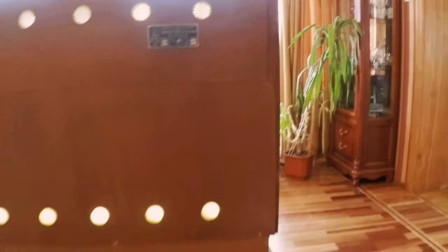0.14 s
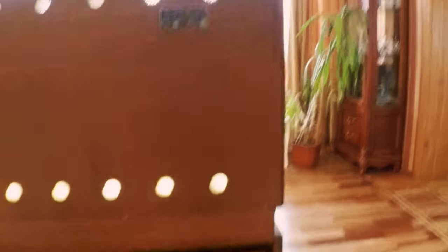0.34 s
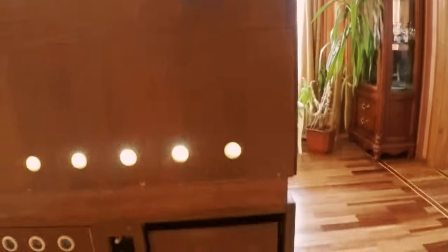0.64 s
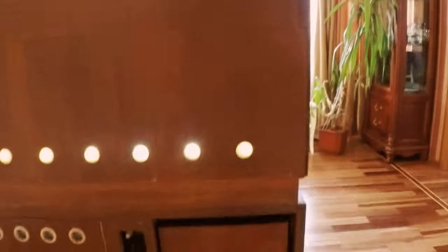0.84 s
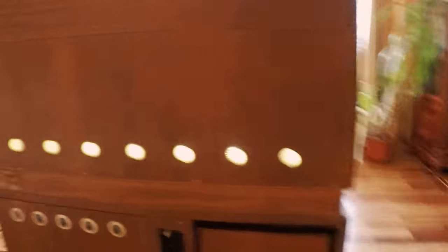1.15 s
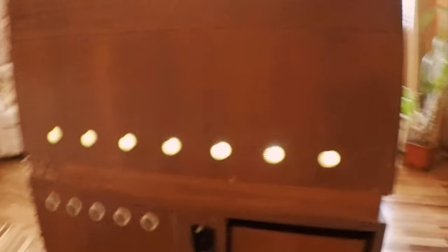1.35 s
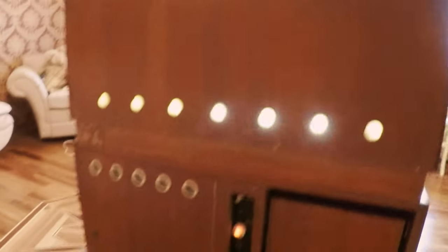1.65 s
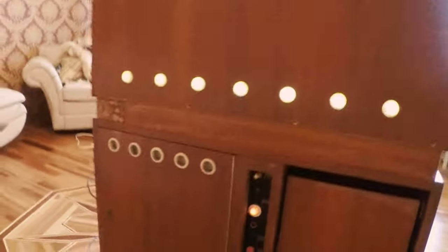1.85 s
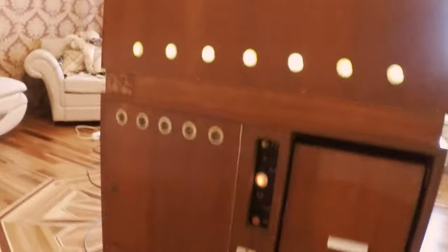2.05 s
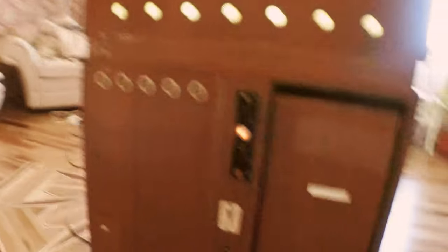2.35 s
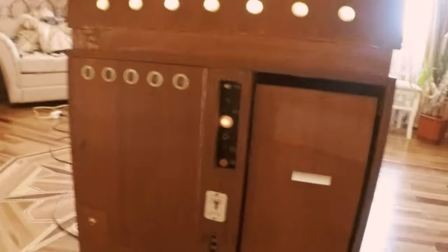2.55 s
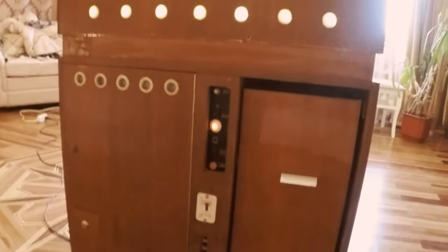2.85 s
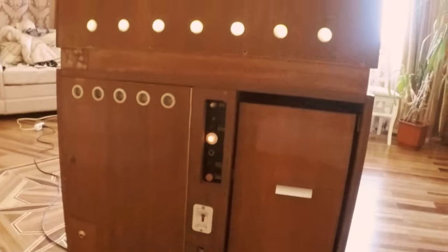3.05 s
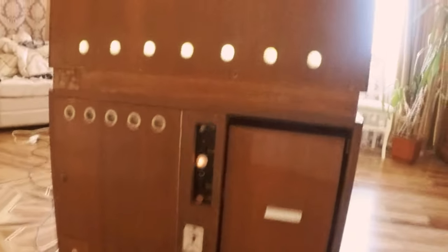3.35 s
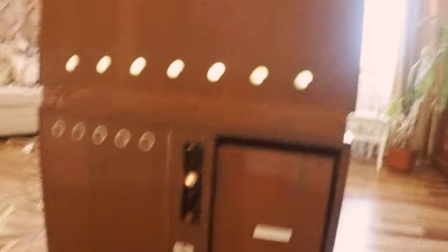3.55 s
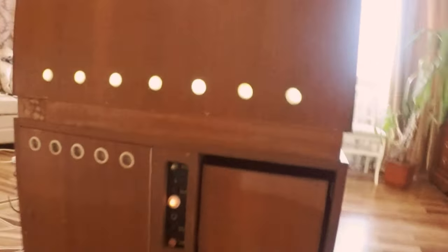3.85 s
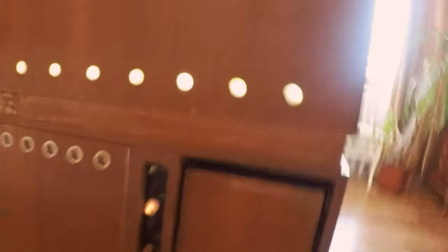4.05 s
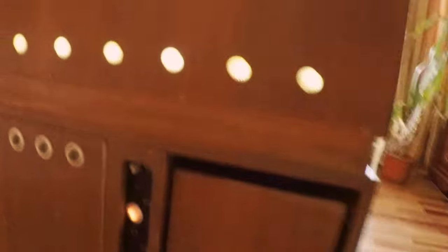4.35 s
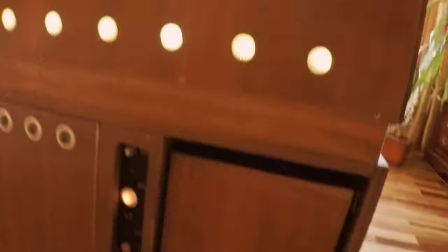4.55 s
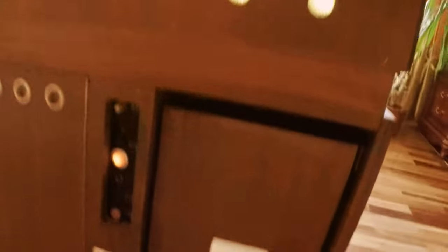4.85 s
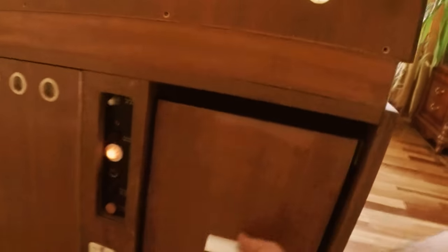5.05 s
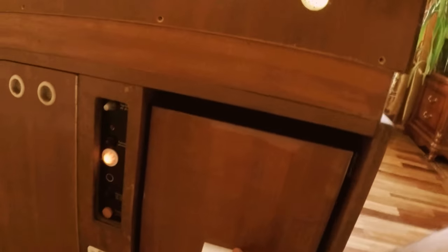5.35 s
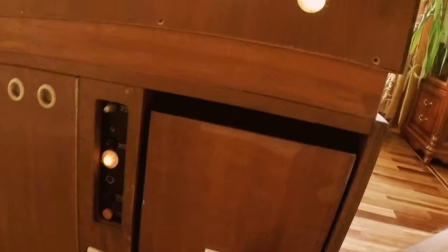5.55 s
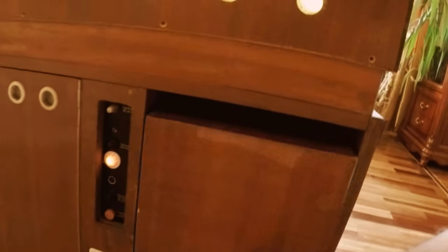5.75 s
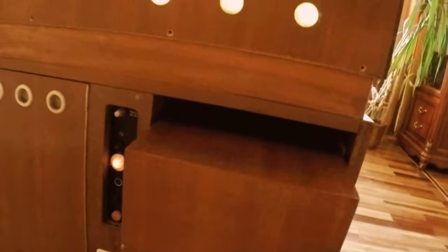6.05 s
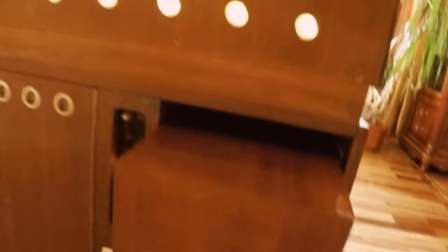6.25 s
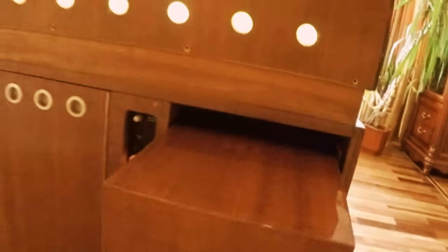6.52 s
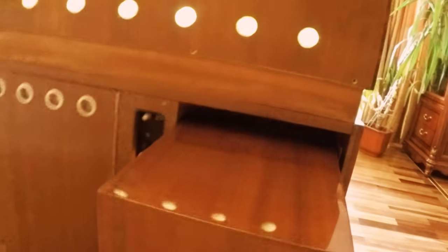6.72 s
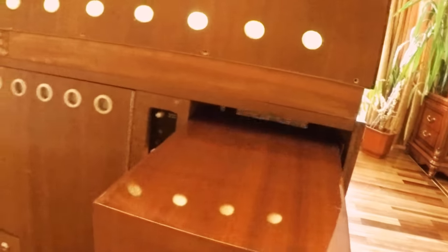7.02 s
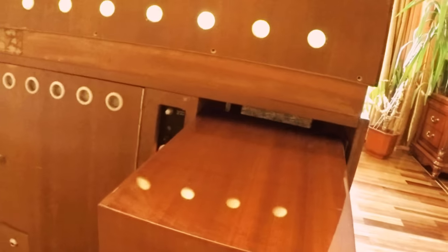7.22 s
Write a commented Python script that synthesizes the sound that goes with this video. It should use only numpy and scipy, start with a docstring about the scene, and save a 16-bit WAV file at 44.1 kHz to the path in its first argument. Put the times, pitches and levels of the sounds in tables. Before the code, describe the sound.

For the first two seconds there is only quiet room rumble, faint hiss and soft hand and sleeve rustle, strongest near 1.5. Light mechanism taps come at 2.2 and 2.4, then a dry bright snap at 2.5 with a short room tail. From 2.7 to 3.3 a small coin clinks in very high, thin rings and grazes a chute; from 3.1 its metallic scrapes repeat ever faster and fainter until about 4.2. Parts rub and knock from 3.6, and at 4.1 one hard, loud clack stands out, followed by clicks and a lesser clunk at 4.4. Quiet taps follow. From 5.1 a heavy wooden drawer drags, with gritty groans around 5.4. At 6.0 it breaks free with a deep thump and low cabinet shudder, then scrapes, clicks and groans near 6.4, fading into light sliding, with small knocks at 6.7 and 7.3.

```python
"""A coin clinks and rattles, wobbling ever faster, through the mechanism of a wooden jukebox in a quiet room.
Struck coin modes beat in close pairs; grazing noise drives the same metal into song.
The mechanism rubs and knocks close by as decaying modes and noise bursts, with one hard clack; catches click.
The room answers a sharp snap. Then the heavy drawer scrapes in swelling friction noise, breaks free with
a thump that shakes the cabinet, and rolls out. Hand and sleeve movements and room noise lie underneath."""
import sys
import numpy as np
from scipy import signal
from scipy.fft import rfft, irfft, next_fast_len
from scipy.io import wavfile
from scipy.ndimage import uniform_filter1d, map_coordinates

SR = 44100
rng = np.random.default_rng(int(sys.argv[2]) if len(sys.argv) > 2 else 0)


def wrap_up_sound(samples):
    """Save the sound to the file named by the first command line argument, as 16-bit audio."""
    columns = np.atleast_2d(samples).T
    # keep every value between -1 and 1, then stretch to whole-number steps
    tamed = np.clip(columns, -1, 1)
    steps = np.round(tamed * 32767).astype(np.int16)
    wavfile.write(sys.argv[1], SR, steps)


N = 325502
T = np.arange(N) / SR

# In all tables, levels are relative: function trims or normalisation follow.
# Strikes on the coin. Each row: start in seconds, tick level in dB, ring level in dB,
# pitch favoured by the struck spot in Hz.
COIN_STRIKES = [(2.4134, -57, -49.5, 13700), (2.7004, -45, -39, 12300), (2.7666, -25.5, -30, 11700),
                (2.8025, -30, -29.5, 12600), (2.8627, -36, -45, 11860), (2.88, -34.5, -43, 11860),
                (2.9114, -43.5, -44, 11120), (2.958, -42, -47, 11120), (3.0051, -33, -39, 7835),
                (3.039, -41, -35, 7835), (3.057, -39.5, -62, 7835), (3.1024, -44, -35, 13500),
                (3.2303, -44.5, -41, 11120), (3.2914, -35, -40, 13300), (3.4564, -50, -39.5, 13500),
                (4.1374, -40.5, -41.5, 13500)]
# Modes of the coin, each a close pair. Each row: frequency in Hz, split in Hz, t60 in seconds.
COIN_MODES = [(7835, 55, .17), (11120, 28, .12), (11860, 14, .17), (13495, 75, .15)]
# Spectrum of the contact tick. Each row: frequency in Hz, level in dB per Hz.
TICK_SPECTRUM = [(1000, -25.5), (2000, -27.5), (2600, -2.5), (3400, -21), (4600, 3.5), (5500, -4),
                 (6300, 1), (8500, -13.5), (15000, -1.5)]
# the highest mode rings best; modes away from the spot stay weak
TOP_MODE_DB, OTHER_MODES_DB, SPOT_WIDTH_HZ = 6, -13, 550


def clinks(ring_db=-5, tick_db=-1, twin=0.4):
    """Modal beating: each strike ticks and rings split mode pairs, mixed by the spot that is hit."""
    out, t = np.zeros(N), T[:SR // 3]
    onset = 1 - np.exp(-t / 0.00078)
    for start, strike_tick_db, strike_ring_db, spot_hz in COIN_STRIKES:
        tick = crest(coloured(rng.standard_normal(len(t)) * fade(t, 0.017), TICK_SPECTRUM))
        add(out, start, amp(strike_tick_db + tick_db) * tick)
        for hz, split_hz, t60 in COIN_MODES:
            away = 1 - np.exp(-.5 * ((hz - spot_hz) / SPOT_WIDTH_HZ) ** 2)
            is_top = hz == COIN_MODES[-1][0]
            mode_db = strike_ring_db + OTHER_MODES_DB * away + TOP_MODE_DB * is_top
            main = np.sin(2 * np.pi * hz * t)
            partner = np.sin(2 * np.pi * (hz + split_hz) * t + rng.standard_normal())
            ring = (main + twin * partner) * fade(t, t60) * onset
            add(out, start, amp(mode_db + ring_db) * crest(ring))
    return out


# The tumbling coin grazing the chute. Each row: centre in seconds, scrape level in dB, ring level in dB.
CHUTE_GRAZES = [(2.839, -41, -56), (2.8963, -39, -61), (2.9616, -51, -51.5), (3.022, -48.5, -45),
                (3.0829, -40, -45), (3.121, -42, -37)]
# The coin sliding between turns. Each row: time in seconds, hiss level in dB.
SLIDE_LEVELS = [(2.72, -90), (2.776, -54), (2.946, -64.5), (3.22, -53.5), (3.642, -62), (4.106, -65.5),
                (4.196, -62.5), (4.338, -68), (4.42, -75)]
# Spectra of the slide, the rim's scrape and the last scrape. Each row: frequency in Hz, level in dB per Hz.
SLIDE_SPECTRUM = [(1000, -21.5), (2300, 3.5), (3200, -7), (4300, 6), (6500, 1), (7300, -4.5), (7900, 4),
                  (9400, 4.5), (10500, 0.5), (12500, 2), (14200, -4.5), (15300, -2.5)]
SCRAPE_SPECTRUM = [(2000, -22), (4300, -5.5), (7300, -11.5), (8000, -2.5), (9300, 7), (10300, -6),
                   (12300, -7), (13200, -5.5), (14200, -20), (15300, 5)]
EXIT_SPECTRUM = [(2500, -15), (4200, -3.5), (4700, 4.5), (6400, -2.5), (7300, -12), (9000, -10.5),
                 (14000, -16.5)]
# Coin resonances that scraping excites. Each row: frequency in Hz, width in Hz, level in dB.
COIN_RESONANCES = [(7880, 90, -8.5), (11200, 90, -19), (13480, 110, 2)]
# the last scrape swells and stops dead
EXIT_START_S, EXIT_END_S, EXIT_RISE_S, EXIT_DB = 4.22, 4.342, .04, -47.5


def rattle(scrape_db=2.5, ring_db=-2.5, slide_db=4, slide_ring_db=-4, contact_s=0.0066, ring_t60=0.077,
           chatter_db=0.5):
    """Friction excitation: each graze or turn is a burst of grainy noise, and the coin sings on after it."""
    scrape, ring = np.zeros(N), np.zeros(N)
    t = T[:SR // 3] - .04  # the contact is centred on zero
    for centre, graze_db, sing_db in CHUTE_GRAZES + turns():
        contact = np.exp(-.5 * (t / contact_s) ** 2)
        ringing = np.where(t < 0, contact, fade(abs(t), ring_t60))
        add(scrape, centre + t[0], amp(graze_db + scrape_db) * contact)
        add(ring, centre + t[0], amp(sing_db + ring_db) * ringing)
    chatter = unit(amp(chatter_db * wobble(120)))
    slide = amp(slide_db) * levels(SLIDE_LEVELS)[0] * chatter
    rim = scrape * noise(SCRAPE_SPECTRUM, grain_db=4.0) + slide * noise(SLIDE_SPECTRUM, grain_db=2.0)
    exit_swell = stroke(EXIT_START_S, EXIT_END_S, EXIT_RISE_S, release=.007)
    leaving = amp(EXIT_DB) * exit_swell * noise(EXIT_SPECTRUM, grain_db=2.5)
    song = (ring + amp(slide_ring_db) * slide) * singing(COIN_RESONANCES)
    return rim + leaving + song


# the coin rolls downhill, gaining speed evenly, and its rim scrapes once a turn
ROLL_START_S, TURNS_PER_S, TURNS_PER_S2, TURN_COUNT = 3.1107, 9.836, 9.727, 19
TURN_SCRAPE_DB, TURN_RING_DB, TURN_FADE_DB_PER_S = -39.5, -40.5, 12


def turns(scatter_db=1.8):
    """Uniform acceleration: turns come ever faster and on average fainter, as (s, scrape dB, ring dB)."""
    speed = np.sqrt(TURNS_PER_S ** 2 + 2 * TURNS_PER_S2 * np.arange(TURN_COUNT))
    age = (speed - TURNS_PER_S) / TURNS_PER_S2
    db = scatter_db * rng.standard_normal(TURN_COUNT) - TURN_FADE_DB_PER_S * age
    return list(zip(ROLL_START_S + age, TURN_SCRAPE_DB + db, TURN_RING_DB + db))


# Knocks of the mechanism. Each row: start in seconds, level in dB, hardness in dB, strongest pitch in Hz.
MECHANISM_KNOCKS = [(2.206, -45, -20, 636), (2.384, -47.5, -20, 714), (3.684, -37, -19, 1010),
                    (3.839, -30, -22, 660), (3.889, -43, -21, 620), (3.95, -39, -2, 644),
                    (3.981, -21.5, -24, 680), (4.087, -3.5, -2.5, 690), (4.1005, -22, -3, 618),
                    (4.18, -29.5, 1, 807), (4.2265, -32, 0.5, 1100), (4.241, -23, -29, 450),
                    (4.294, -34, -5.5, 900), (4.4247, -17, -11, 1027), (4.715, -44.5, -23, 838),
                    (4.855, -50, -21, 805), (6.674, -46, -20, 416.3), (7.299, -40.5, -19, 725)]
# Modes of the housing. Each row: frequency in Hz, level in dB, t60 in seconds for a 0 dB blow.
HOUSING_MODES = [(68.5, -9, 0.1), (107, -14, .08), (144, -15, 0.033), (200, -10, 0.11), (281, -11, 0.16),
                 (456.7, -5.5, 0.12), (556.4, -9, 0.084), (699, 1, 0.065), (782, -3.5, 0.086),
                 (1033, -2, 0.047), (1100, 0, .04), (1190, -9, 0.065), (1284, -12, 0.07),
                 (1610, -13.5, 0.042), (1707, -7.5, 0.048), (1800, -25, 0.29), (2010, -12.5, 0.062),
                 (2350, -12, 0.1), (2290, -17, 0.04), (2530, -15, .04), (2424, -11.5, 0.091),
                 (2940, -19.5, .03), (4140, -20.5, 0.061), (4200, -28, .028), (4770, -24, .028),
                 (4960, -29, 0.026)]
# Spectra of the contact crack and of the many short-lived modes heard as one burst.
# Each row: frequency in Hz, level in dB per Hz.
CRACK_SPECTRUM = [(100, 6), (500, -16.5), (1100, -10.5), (2500, 1), (3600, -18), (4500, -7), (5700, -31),
                  (6400, -20.5), (7500, -36), (15000, -45.5)]
CLUNK_SPECTRUM = [(180, -41.5), (300, -12), (755, 0.5), (1170, -10), (1460, -19), (1750, -8), (1980, -16.5),
                  (2540, -15), (3670, -34), (4470, -26.5), (7000, -45), (9100, -74), (15400, -120)]
RING_DOUBLES_DB = 56.5  # a blow this much stronger rings twice as long


def knocks(bass_db=-11.0, mid_db=-2.5, treble_db=-4, crack_db=-6.0, clunk_db=-2, clunk_t60=.04,
           rise_cycles=.7, focus_db=7, focus_octaves=.25, contact_db=7, contact_t60=0.0072):
    """Impact hardness: soft blows ring the middle modes, hard ones clunk and wake all; the spot favours a few."""
    out, t = np.zeros(N), T[:SR // 3]
    hz, mode_db, t60 = np.transpose(HOUSING_MODES)[:, :, None]
    register = np.digitize(hz[:, 0], [400, 1500])  # bass, middle, treble
    # high modes answer first; all are driven harder while the contact lasts
    onset = 1 - np.exp(-t * np.maximum(hz, 400) / rise_cycles)
    drive = onset * (1 + amp(contact_db) * fade(t, contact_t60))
    for start, db, hard_db, spot_hz in MECHANISM_KNOCKS:
        spot = np.exp(-.5 * (np.log2(hz / spot_hz) / focus_octaves) ** 2)
        swing = np.sin(2 * np.pi * (hz * t + rng.random(hz.shape)))
        decay = fade(t, t60 * 2 ** (db / RING_DOUBLES_DB))
        modes = amp(mode_db + focus_db * spot) * swing * drive * decay
        for k, level in enumerate([hard_db + bass_db, mid_db, hard_db + treble_db]):
            add(out, start, amp(db + level) * crest(modes[register == k].sum(0)))
        for spectrum, level, burst_t60 in [(CRACK_SPECTRUM, crack_db, .012), (CLUNK_SPECTRUM, clunk_db, clunk_t60)]:
            burst = rng.standard_normal(len(t)) * fade(t, burst_t60) * (1 - np.exp(-t / .0004))
            add(out, start, amp(db + hard_db + level) * crest(coloured(burst, spectrum)))
    return out


# Clicks of a small stiff catch. Each row: start in seconds, level in dB.
CATCH_CLICKS = [(4.0854, -22), (4.1001, -32), (4.181, -34.5), (4.378, -46), (4.4251, -32), (4.7708, -38.5),
                (5.18, -54), (6.366, -29.5)]
# Modes of the catch. Each row: frequency in Hz, level in dB, t60 in seconds.
CATCH_MODES = [(890, 5, 0.014), (1784, -4.5, 0.01), (2550, -1, 0.017), (3200, -4.5, 0.011),
               (4437, 0.5, .02), (5076, -11.5, 0.018), (6380, -9.5, 0.017), (7140, -16.5, .01),
               (9410, -16, .008), (13790, -21.5, 0.009)]


def catches():
    """Heavily damped modes: each tiny click rings for a few milliseconds, its mode mix varying."""
    out, t = np.zeros(N), T[:SR // 20]
    for start, db in CATCH_CLICKS:
        ring = np.zeros(len(t))
        for hz, level, t60 in CATCH_MODES:
            gain = amp(level + rng.normal(0, 1.9))
            ring += gain * np.sin(2 * np.pi * (hz * t + rng.random())) * fade(t, t60)
        add(out, start, amp(db) * crest(ring * (1 - np.exp(-t / 0.00017))))
    return out


# Parts rubbing in the mechanism and along the drawer. Each row: start in seconds, end in seconds,
# low band level in dB, high band level in dB.
RUB_STROKES = [(3.553, 3.629, -46, -59), (3.631, 3.775, -56.5, -64.5), (3.947, 4.04, -46.5, -47.5),
               (4.04, 4.19, -41.5, -51.5), (4.216, 4.251, -37, -62), (4.252, 4.331, -48.5, -55),
               (6.06, 6.15, -45, -52)]
# Spectra of the low and high rubbing bands. Each row: frequency in Hz, level in dB per Hz.
RUB_LOW_SPECTRUM = [(150, -14.5), (400, 0), (550, 2.5), (800, 9), (1100, 5), (1500, -4.5), (2200, -29.5),
                    (4000, -36.5)]
RUB_HIGH_SPECTRUM = [(900, -26), (1700, -5.5), (2330, -1), (2500, 11), (2680, -3.5), (3400, -13.5),
                     (4020, -5.5), (4270, 1.5), (4500, -2.5), (5300, -8.5), (5900, -8.5), (6500, -12.5),
                     (7400, -22), (14000, -30.5)]


def rubs(release=0.004):
    """Sliding friction: parts passing over each other give short strokes of grainy noise."""
    low, high = np.zeros(N), np.zeros(N)
    for start, end, low_db, high_db in RUB_STROKES:
        contact = stroke(start, end, rise=0.0022, release=release)
        low += amp(low_db) * contact
        high += amp(high_db) * contact
    return low * noise(RUB_LOW_SPECTRUM, grain_db=1.5) + high * noise(RUB_HIGH_SPECTRUM, grain_db=2.0)


# Spectrum of the snap. Each row: frequency in Hz, level in dB per Hz.
SNAP_SPECTRUM = [(200, -34), (450, -4), (1000, -12), (1400, -3.5), (1720, -10.5), (2000, 6.5), (2250, -4.5),
                 (2650, 3), (3200, -8.5), (3900, -1.5), (5200, -8.5), (6500, -14), (10000, -21),
                 (15000, -21)]
SNAP_S = 2.4722


def snap(db=-28, room_db=-1, crack_t60=0.025):
    """Direct and reverberant sound: one dry, bright crack wakes the room."""
    direct, sent, t = np.zeros(N), np.zeros(N), T[:SR // 8]
    burst = rng.standard_normal(len(t)) * fade(t, crack_t60) * (1 - np.exp(-t / .002))
    add(direct, SNAP_S, amp(db) * crest(coloured(burst, SNAP_SPECTRUM)))
    # summed over all directions, the room receives the crack's smooth overall colour
    impulse = 1.0 * (t == 0)
    add(sent, SNAP_S, amp(db + room_db) * crest(coloured(impulse, SNAP_SPECTRUM)))
    return direct + room(sent)


# Pulls on the drawer, and one small knock just before the thump. Each row: peak time in seconds,
# rise in seconds, fall in seconds, wood level in dB, grit level in dB, groan level in dB,
# groan pitch in Hz (blended between rows).
DRAWER_EFFORTS = [(5.14, 0.00799, .08, -52.5, -93.5, -54.5, 329.3), (5.36, .06, .03, -51, -59, -51.5, 430),
                  (5.422, .02, .02, -49, -41.5, -38, 550), (5.459, .018, .04, -50, -45.5, -40, 610.3),
                  (5.89, 0.0051, 0.02496, -44, -77, -51, 400), (6.07, 0.014, .09, -37.5, -49, -54, 480),
                  (6.18, .012, .033, -33, -51.5, -54, 476.3), (6.405, .022, 0.061, -33, -51, -35.5, 424.4),
                  (6.63, 0.031, 0.0409, -43.5, -59.5, -46.5, 410), (7.02, 0.049, .15, -56, -81.5, -63, 422)]
# Spectra of the wood on its runners and of the grit. Each row: frequency in Hz, level in dB per Hz.
WOOD_SPECTRUM = [(71, -42), (120, -5), (167, -13.5), (232, -4.5), (258, -1.5), (330, -1.5), (386, -0.5),
                 (511, -5), (556, 0), (727, -7.5), (962, -13.5), (1130, -26.5), (2200, -28), (2860, -50),
                 (4840, -120)]
GRIT_SPECTRUM = [(900, 4.5), (1500, -3), (2200, -2), (2600, 5.5), (2900, -5.5), (3400, -13.5), (4800, -7.5),
                 (6200, -21), (8000, -43.5), (14000, -39.5)]
# Resonances of the runner's rail. Each row: frequency in Hz, width in Hz, level in dB.
RAIL_RESONANCES = [(2320, 130, -6), (2820, 77, 9)]
# between pulls the drawer keeps dragging, ever more lightly
DRAG_START_S, DRAG_RISE_S, DRAG_FADE_DB_PER_S = 5.22, 0.024, 4.5
DRAG_WOOD_DB, DRAG_GRIT_DB = -52.5, -58.5


def drawer(wood_db=-2, grit_db=-1, rasp_db=-6, groan_wander_hz=95, groan_rough_db=3.0, judder_db=0.5):
    """Stick and slip: pulls and a small knock swell and die; wood judders on runners that rasp and groan."""
    drag = stroke(DRAG_START_S, T[-1], DRAG_RISE_S, release=1)
    drag *= amp(-DRAG_FADE_DB_PER_S * (T - DRAG_START_S))
    peak, rise, fall, board_db, sand_db, groan_db, hz = np.transpose(DRAWER_EFFORTS)
    t = T[::100, None]  # the effort varies slowly, so it is computed coarsely
    side = np.where(t < peak, rise, fall)
    effort = np.exp(1 - np.hypot(1, (t - peak) / side)) ** 2 + 1e-12  # a power: rows add as energies
    wood, grit, groan = (np.interp(T, t[:, 0], np.sqrt(effort @ amp(db) ** 2)) for db in (board_db, sand_db, groan_db))
    glide = np.interp(T, t[:, 0], effort @ hz / effort.sum(1))
    pitch = glide + groan_wander_hz * wobble(330)
    slips = unit(amp(groan_rough_db * wobble(120)) * np.sin(2 * np.pi * np.cumsum(pitch) / SR))
    judder = unit(amp(judder_db * wobble(76)))
    boards = amp(wood_db) * judder * noise(WOOD_SPECTRUM, grain_db=2.5)
    runners = amp(grit_db) * noise(GRIT_SPECTRUM, grain_db=1.5) + amp(rasp_db) * singing(RAIL_RESONANCES)
    wood = np.hypot(wood, amp(DRAG_WOOD_DB) * drag)
    grit = np.hypot(grit, amp(DRAG_GRIT_DB) * drag)
    return wood * boards + grit * runners + groan * slips


# Panel modes of the cabinet. Each row: frequency in Hz, level in dB, t60 in seconds.
CABINET_MODES = [(99.9, -12, 0.51), (160, 3, 0.23), (295, 0.5, 0.25), (348.4, -3.5, 0.31), (392, 2.5, 0.36),
                 (450, -19, .3), (558, 4, 0.22), (717, -0.5, 0.2), (822, -2, 0.15)]
# Spectrum of the dull blow. Each row: frequency in Hz, level in dB per Hz.
THUD_SPECTRUM = [(47, -52), (80, 2.5), (163, -3.5), (219, -10.5), (306, -1), (402, -3), (485, 2.5),
                 (550, -12), (693, -2), (930, -17), (1780, -24), (3140, -39), (12000, -70), (15600, -105),
                 (22000, -120)]
THUMP_S = 5.9966


def thump(ring_db=-8.5, thud_db=-15, room_db=-4, thud_t60=0.28):
    """Impulsive excitation: the drawer breaks free with a dull blow that rings the cabinet's panels."""
    out, t = np.zeros(N), T[:SR]
    rise = 1 - np.exp(-t / 0.0026)
    ring = np.zeros(len(t))
    for k, (hz, db, t60) in enumerate(CABINET_MODES):
        ring += (-1) ** k * amp(db) * np.sin(2 * np.pi * hz * t) * fade(t, t60)
    thud = coloured(rng.standard_normal(len(t)) * fade(t, thud_t60) * rise, THUD_SPECTRUM)
    add(out, THUMP_S, amp(thud_db) * crest(thud))
    out += amp(room_db) * room(out)  # only the thud is sent to the room
    add(out, THUMP_S, amp(ring_db) * crest(ring * rise))
    return out


# Lowest modes of the cabinet. Each row: frequency in Hz, width of the pitch's wander in Hz, level in dB.
SWAY_MODES = [(36.8, 5, 1), (60.9, 6.7, 3), (97.6, 11, -10), (147.7, 5.6, -25)]
SHUDDER_DB, SHUDDER_RISE_S, SHUDDER_HOLD_S, SHUDDER_RELEASE_S = -21.5, 0.047, 0.19, 0.072


def shudder():
    """Low-frequency resonance: after the thump the whole cabinet shakes on its lowest, wavering modes."""
    shaking = T > THUMP_S
    sway = np.zeros(N)
    for hz, width, level in SWAY_MODES:
        pitch = shaking * (hz + width / 2 * wobble(14))
        sway += amp(level) * np.sin(2 * np.pi * np.cumsum(pitch) / SR)
    envelope = stroke(THUMP_S, THUMP_S + SHUDDER_HOLD_S, SHUDDER_RISE_S, SHUDDER_RELEASE_S)
    return amp(SHUDDER_DB) * envelope * sway / np.std(sway[shaking])


# Movements of a hand. Each row: centre in seconds, half length in seconds, rumble level in dB,
# soft rustle level in dB, sleeve hiss level in dB.
HAND_MOVES = [(.7, 0.14, -72, -69, -67.5), (1.487, .2, -56.5, -65, -65.5), (3.331, .16, -70, -57.5, -88),
              (4.019, .18, -46, -59.5, -82), (5.075, 0.27, -55.5, -66.5, -74),
              (5.92, 0.089, -55, -67.5, -83.5), (6.689, 0.18, -51, -60, -87)]
# Spectra of the rumble, the soft rustle and the sleeve. Each row: frequency in Hz, level in dB per Hz.
RUMBLE_SPECTRUM = [(15, -12.5), (30, 7), (70, -4), (120, -11.5), (250, -30), (800, -59)]
RUSTLE_SPECTRUM = [(100, -20.5), (220, -1.5), (330, 0.5), (560, -2), (800, -9), (1500, -23.5), (5000, -42)]
SLEEVE_SPECTRUM = [(1000, -17), (2500, -3), (4500, 0.5), (7000, -3.5), (11500, -8), (15000, -11.5)]
HOLD_RUSTLE_DB = -70  # the hand at rest


def handling():
    """Contact noise: each movement of the hand swells as a rumble, a soft rustle and a sleeve's hiss."""
    rumble, rustle, sleeve = np.zeros((3, N))
    for centre, length, rumble_db, rustle_db, sleeve_db in HAND_MOVES:
        swell = np.exp(-.5 * ((T - centre) / length) ** 2)
        rumble += amp(rumble_db) * swell
        rustle += amp(rustle_db) * swell
        sleeve += amp(sleeve_db) * swell
    rustle = np.hypot(rustle, amp(HOLD_RUSTLE_DB))
    cloth = rustle * noise(RUSTLE_SPECTRUM) + sleeve * noise(SLEEVE_SPECTRUM, grain_db=2.0)
    return rumble * noise(RUMBLE_SPECTRUM) + amp(1.1 * wobble(6.1)) * cloth


# Reverberation of the room. Each row: frequency in Hz, t60 in seconds.
ROOM_DECAY = [(100, 1), (500, 0.65), (2500, 0.49), (6000, .42), (14000, 0.49)]


def room(x):
    """Diffuse reverberation: a noise tail whose decay depends on frequency, longest in the bass."""
    hz, t, z = signal.stft(rng.standard_normal(SR), SR, nperseg=256)
    tail = signal.istft(z * fade(t, along(ROOM_DECAY, hz)[:, None]), SR, nperseg=256)[1]
    tail *= 1 - np.exp(-np.arange(len(tail)) / SR / 0.017)  # reflections build up
    return signal.fftconvolve(x, tail / np.linalg.norm(tail))[:N]


# Spectrum of the quiet room. Each row: frequency in Hz, level in dB per Hz.
AIR_SPECTRUM = [(12, -29), (20, 1), (39, 2.5), (59, -10.5), (103, -5.5), (225, -20), (315, -18.5),
                (519, -23), (1010, -32), (2210, -31), (3170, -32.5), (4810, -32), (6910, -38), (13900, -44),
                (15500, -46)]


def air(db=-54.5):
    """Stationary background noise: the quiet room's rumble and hiss, its level drifting slightly."""
    return amp(db + 0.62 * wobble(3.2)) * noise(AIR_SPECTRUM)


def noise(spectrum, grain_db=0):
    """Spectral shaping: coloured noise of rms 1, clumped into grains of about a millisecond."""
    white = rng.standard_normal(N) * amp(grain_db * wobble(SR / 40))
    return unit(filtered(white, lambda hz: amp(along(spectrum, hz))))


def singing(modes):
    """Forced resonance: band-pass modes driven by random contact, rms 1."""
    def response(f):
        return sum(amp(db) * 1j * f * w / (c * c - f * f + 1j * f * w) for c, w, db in modes)
    return unit(filtered(rng.standard_normal(N), response))


def stroke(start, end, rise, release):
    """Exponential relaxation: an envelope that rises from start, holds until end and dies away."""
    since, after = np.maximum(T - start, 0), np.maximum(T - end, 0)
    return (1 - np.exp(-since / max(rise, 1e-4))) * np.exp(-after / max(release, 1e-4))


def fade(t, t60):
    """Exponential decay: 60 dB down after t60."""
    return np.exp(-np.log(1000) * t / np.maximum(t60, 1e-4))


def wobble(rate):
    """Band-limited randomness: a smooth random curve, rate knots a second."""
    return map_coordinates(rng.standard_normal(int(N * rate / SR) + 4), [T * rate], order=2)


def coloured(x, spectrum, size=2048):
    """Minimum phase: x through a causal filter with the given spectrum, made by folding its cepstrum."""
    gain = amp(along(spectrum, np.fft.rfftfreq(size, 1 / SR)))
    cepstrum = irfft(np.log(gain + 1e-6))
    cepstrum[1:size // 2] *= 2
    cepstrum[size // 2 + 1:] = 0
    return signal.fftconvolve(x, irfft(np.exp(rfft(cepstrum))))[:len(x)]


def filtered(x, response):
    """Linear filtering: x times a response of frequency."""
    m = next_fast_len(len(x) + SR // 4)
    return irfft(rfft(x, m) * response(np.fft.rfftfreq(m, 1 / SR)), m)[:len(x)]


def levels(rows):
    """Level interpolation: a gain per sample for each dB column, silent outside the rows."""
    s, *cols = np.transpose(rows)
    inside = (T >= s[0]) & (T <= s[-1])
    return [np.where(inside, amp(np.interp(T, s, c)), 0) for c in cols]


def along(points, hz):
    """Logarithmic frequency scale: (Hz, value) points read on a log axis."""
    f, v = np.transpose(points)
    return np.interp(np.log(hz + 1), np.log(f + 1), v)


def amp(db):
    """Decibel scale: decibels to gain."""
    return 10 ** (np.asarray(db) / 20)


def unit(x):
    """Mean power: x at rms 1."""
    return x / np.sqrt(np.mean(x ** 2) + 1e-20)


def crest(x):
    """Short-time power: x with its loudest 2 ms at rms 1."""
    return x / np.sqrt(uniform_filter1d(x ** 2, size=88).max() + 1e-20)


def add(track, s, x):
    """Superposition: mix x into the track at time s."""
    part = track[max(round(s * SR), 0):][:len(x)]
    part += x[:len(part)]


def scene():
    """Direct-to-reverberant balance: coin and mechanism are close and almost dry."""
    close = clinks() + rattle() + knocks() + catches() + rubs()
    cabinet = snap() + drawer() + thump() + shudder()
    return (close + amp(-31.5) * room(close) + cabinet + handling() + air())[None]


TOP_HZ = 15350


def record(dry):
    """Saturation and band limiting: high peaks are rounded off, and nothing is kept above TOP_HZ."""
    rounded = dry[0] / (1 + (dry[0] / .98) ** 8) ** (1 / 8)
    return filtered(rounded, lambda hz: hz < TOP_HZ)[None]


dry = scene()
out = record(dry)
wrap_up_sound(out)
```